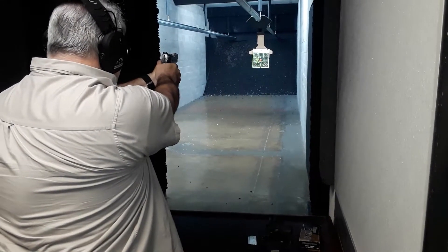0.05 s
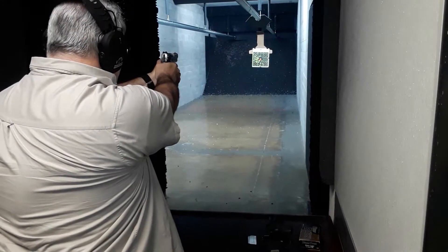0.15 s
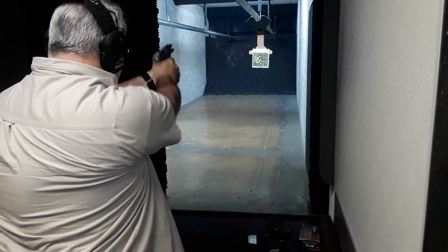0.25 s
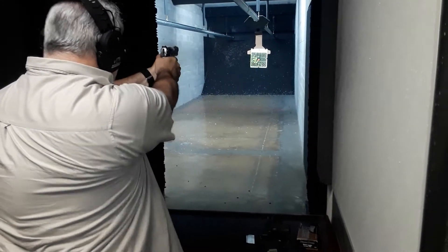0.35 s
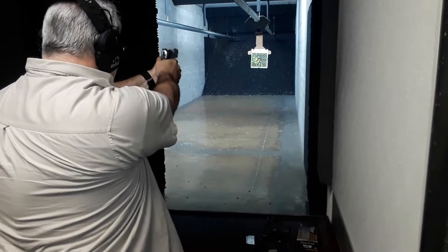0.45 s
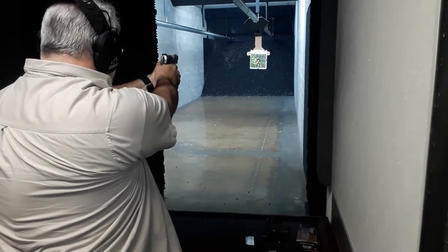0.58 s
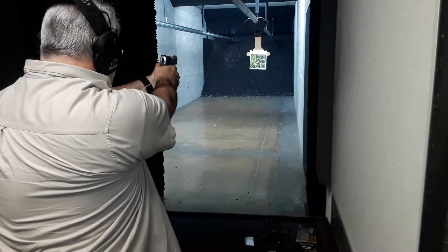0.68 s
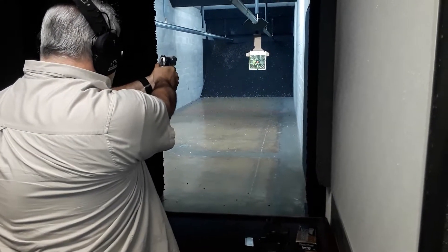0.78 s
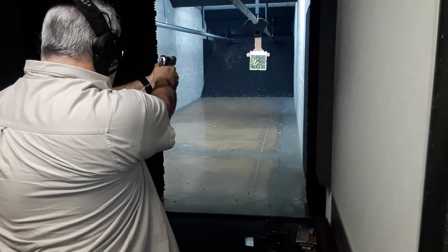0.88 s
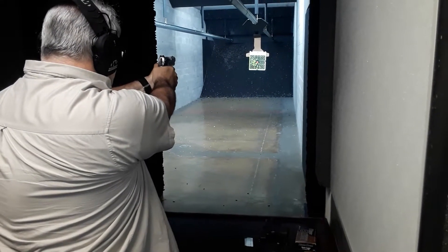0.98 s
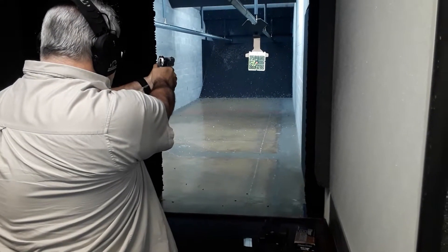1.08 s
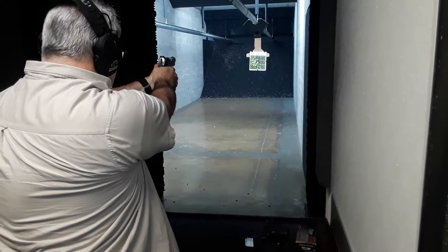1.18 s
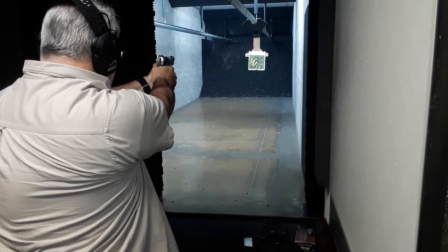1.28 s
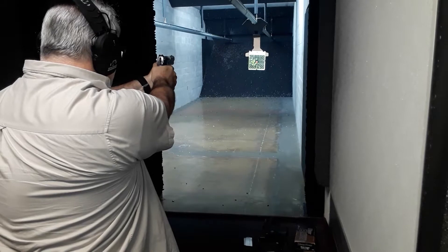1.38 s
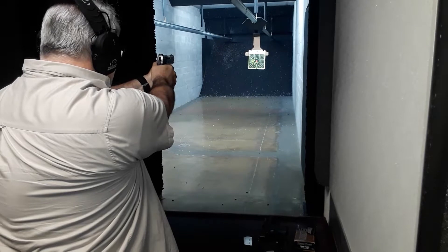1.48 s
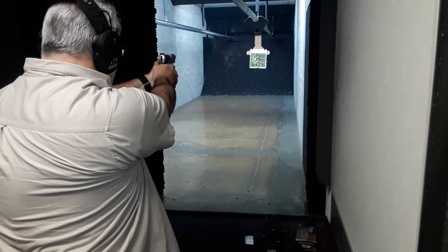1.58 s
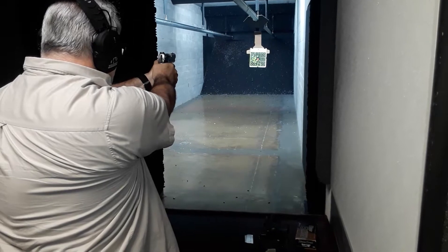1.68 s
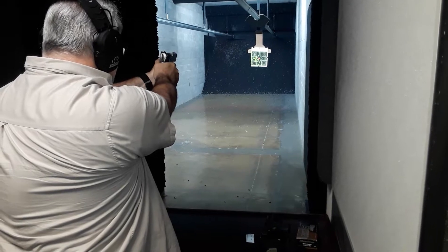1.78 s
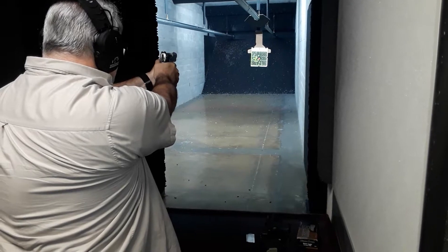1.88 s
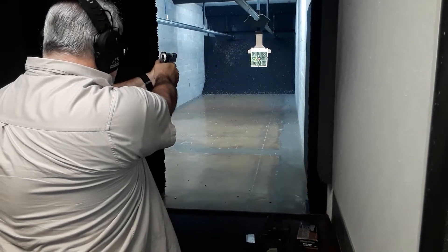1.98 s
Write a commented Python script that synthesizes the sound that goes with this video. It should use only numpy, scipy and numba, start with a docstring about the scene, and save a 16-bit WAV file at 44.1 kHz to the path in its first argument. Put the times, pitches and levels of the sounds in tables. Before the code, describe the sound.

One loud pistol shot goes off close by at about 0.25 seconds, over the steady rush and hum of ventilation in an indoor range. The sharp crack swells into a booming echo that fades by about 1 second. Near 0.7 seconds a spent brass case ticks faintly on the floor with a thin ring. The ventilation drops in level after the shot and comes back around 1.5 seconds.

```python
"""One pistol shot in a lane of an indoor range, heard from just behind the shooter over the ventilation.
The muzzle blast rattles round the booth, the concrete hall swells into a roar, standing waves ring on
and echoes slap back down the lane. The spent brass case ticks on the floor and rings.
The shot overloads the microphone's gain control, which ducks everything
and lets the ventilation back up more than a second later."""
import sys
import numpy as np
from scipy import signal
from scipy.fft import rfft, irfft
from scipy.io import wavfile
from numba import njit

SR = 44100
rng = np.random.default_rng(int(sys.argv[2]) if len(sys.argv) > 2 else 0)


def dump_mix(stems):
    """Bounce the given channels to the path in sys.argv[1] as a 16-bit WAV at rate SR."""
    frames = np.atleast_2d(stems).T  # one column per channel
    limited = np.clip(frames, -1, 1)  # hard clip at full scale
    pcm = np.round(limited * 32767).astype(np.int16)
    wavfile.write(sys.argv[1], SR, pcm)


N = 88200
SHOT_S = .2477


def undb(db):
    """Decibels to gain."""
    return 10 ** (np.asarray(db) / 20)


def lookup(table, hz):
    """The columns of a table at a frequency, on a log axis."""
    columns = np.array(table, float).T
    return [np.interp(np.log(hz + 1e-3), np.log(columns[0]), column) for column in columns[1:]]


def fade(age, t60):
    """Full level until age 0, then an exponential decay."""
    return undb(-60 * np.maximum(age, 0) / t60)


def rise(age, attack_s):
    """A smooth attack from silence."""
    return 1 - np.exp(-(np.maximum(age, 0) / attack_s) ** 2)


# How alike left and right are: frequency_hz, correlation
STEREO_LIKENESS = [(30, 0.62), (70, .98), (160, 1), (300, 0.87), (700, 0.73), (1300, 0.28), (2500, 0.084),
                   (5000, -0.044), (15000, .05)]

def diffuse():
    """Spectrum of a diffuse stereo noise: centred in the bass, wide in the treble."""
    hz = np.arange(N // 2 + 1) * SR / N
    alike = np.clip(lookup(STEREO_LIKENESS, hz)[0], -.999, .999)
    mid, side = rfft(rng.standard_normal((2, N)))
    return mid * np.sqrt((1 + alike) / 2) + np.array([[1], [-1]]) * side * np.sqrt((1 - alike) / 2)


def noise_band(hz, octaves):
    """Diffuse noise at rms 1, tapering to nothing `octaves` either side of hz."""
    offset = np.log2((np.arange(N // 2 + 1) + 1) * SR / N / hz) / octaves
    noise = irfft(diffuse() * np.cos(np.clip(offset, -1, 1) * np.pi / 2), N)
    return noise / np.std(noise)


def noise_bank():
    """Unrelated half-octave noises that sum to rms 1 per octave."""
    centres = 31.25 * 2 ** np.arange(0, 9.1, .5)
    return [(hz, noise_band(hz, .51) / np.sqrt(2)) for hz in centres]


# Drone of the ducts, before the trim: pitch_hz, half_width_octaves, level_db
DUCT_DRONES = [(136.7, 0.052, -42.5), (184, 0.075, -41), (205.3, 0.055, -37), (242.6, 0.045, -34.5),
               (302, 0.09, -48.5), (334.4, 0.035, -38), (362.3, 0.043, -43.5), (1004, .05, -51),
               (1447, .05, -52), (1790, .05, -46)]
# Rush of the grilles, before the trim: frequency_hz, octave_level_db
GRILLE_RUSH = [(30, -48), (55, -56), (85, -40.5), (130, -37), (200, -31.5), (310, -37), (480, -41.5),
               (900, -39.5), (1700, -33), (2500, -44.5), (3300, -47), (5500, -60), (8000, -64.5),
               (10500, -73.5), (15000, -73.5)]

def ventilation(t, flutter_db=.4, trim_db=.5):
    """The bed: air drones in the ducts and rushes from the grilles, the rush fluttering a little."""
    air = sum(undb(db) * noise_band(hz, width) for hz, width, db in DUCT_DRONES)
    for hz, noise in noise_bank():
        flutter = np.interp(t, np.linspace(0, t[-1], 20), rng.standard_normal(20))
        air += noise * undb(lookup(GRILLE_RUSH, hz)[0] + flutter_db * flutter)
    return air * undb(trim_db)


def muzzle_blast(age, gain_db=13.5, push_s=.0017, attack_s=.0002):
    """The punch: a sudden push and a longer suction, in inverted polarity."""
    progress = np.maximum(age, 0) / push_s
    return -undb(gain_db) * rise(age, attack_s) * (1 - progress) * np.exp(-progress)


# Tone of the booth's reflections: frequency_hz, octave_level_db
BOOTH_TONE = [(30, -32), (70, -20.5), (150, -18), (300, -14.5), (600, -6), (1200, 2.5), (2400, 2),
              (4800, -3.5), (9000, -12), (14000, -11)]

def booth_crack(age, attack_s=.0012, hold_s=.041, t60_s=.12):
    """The crack: bright, dense reflections off the partitions and ceiling."""
    crack = sum(undb(lookup(BOOTH_TONE, hz)[0]) * noise for hz, noise in noise_bank())
    return crack * rise(age, attack_s) * fade(age - hold_s, t60_s)


# Roar of the hall: frequency_hz, octave_level_db, crest_after_shot_s, t60_s
HALL_ROAR = [(30, -26, .18, 0.88), (65, -20.5, 0.17, 0.35), (123, -3.5, 0.12, 0.89),
             (200.4, -2, 0.13, 0.79), (410, -5, 0.14, 0.73), (818, 3.5, 0.12, .53), (1530, 0.5, 0.13, 0.5),
             (2950, -4, 0.073, 0.6), (6000, -18, 0.091, .52), (9880, -15, 0.047, 0.5),
             (15000, -28, 0.086, .37)]

def hall_roar(age, swell_share=.42, steepening=1.264, tail_db=-18, tail_t60_s=1.77):
    """The body: the hall fills, bass last, then dies away ever faster, leaving a slow, dark tail."""
    out = 0
    for hz, noise in noise_bank():
        db, crest_s, t60_s = lookup(HALL_ROAR, hz)
        swell = rise(age, swell_share * crest_s)
        roar = undb(-60 * (np.maximum(age - crest_s, 0) / t60_s) ** steepening)
        tail = undb(tail_db) * fade(age - crest_s, tail_t60_s) / (1 + (hz / 2300) ** 2)
        out += noise * undb(db) * np.hypot(roar, tail) * swell
    return out


# Resonances of the lane: pitch_hz, level_db
LANE_RESONANCES = [(140, -6), (170, -7), (194, -2), (227, -5.5), (324, -10), (364, -8.5), (466, -5.5),
                   (534, -15), (583, -3.5), (623, -21), (728, -4), (823, -11.5), (951, -8), (1135, -11.5),
                   (1232, -6.5), (1383, -10.5), (1997, -10.5)]

def standing_waves(age, detune_hz=7, swell_s=.052, hold_s=.08, t60_s=.85):
    """Clusters of three close modes between the concrete walls build with the roar, beat and ring on."""
    out = 0
    for hz, db in LANE_RESONANCES:
        for _ in range(3):
            pitch_hz = hz + detune_hz * rng.uniform(-1, 1)
            phase = rng.uniform(0, 2 * np.pi)
            stereo_phase = rng.standard_normal((2, 1)) * hz / 1500  # higher modes sound wider
            out += undb(db) * np.sin(2 * np.pi * pitch_hz * age + phase + stereo_phase) / np.sqrt(3)
    return out * rise(age, swell_s) * fade(age - hold_s, t60_s)


# Strong echoes: peak_time_s, level_db, centre_hz, half_width_octaves (at half power), half_length_s
LANE_ECHOES = [(0.298, 6.5, 250, 0.99, 0.016), (.347, -13.5, 7740, 0.48, 0.013),
               (0.36, 6, 806, 0.43, 0.016), (0.426, 1.5, 195, 0.25, .01), (0.571, -14.5, 1020, 0.19, 0.013),
               (.62, -9, 187, 0.28, 0.0086)]

def lane_echoes(t):
    """The blast slaps back from down the lane, smeared into soft-edged bursts of noise."""
    return sum(undb(db) * noise_band(hz, 2 * width) * np.exp(-((t - peak_s) / half_length_s) ** 2)
               for peak_s, db, hz, width, half_length_s in LANE_ECHOES)


# Landings of the case: start_s, tick_db, ring_db, ring_attack_s
CASE_LANDINGS = [(.683, -25, -64, 0.011), (.886, -85, -56, .045)]
# Partials of the brass: pitch_hz, level_db (relative to ring_db), t60_s
BRASS_PARTIALS = [(7350, 17.5, 0.21), (7310, -8, .22), (11690, -16, .35)]

def spent_case(t, tick_hz=4290, tick_t60_s=.029, splash_db=-18):
    """The brass case ticks on the floor and rings thinly as it tumbles."""
    out = 0
    for start_s, tick_db, ring_db, ring_attack_s in CASE_LANDINGS:
        age = t - start_s
        tick = noise_band(tick_hz, octaves=.13) + undb(splash_db) * noise_band(7500, octaves=1.3)
        out += undb(tick_db) * tick * rise(age, attack_s=.0005) * fade(age, tick_t60_s)
        for hz, db, t60_s in BRASS_PARTIALS:
            partial = np.sin(2 * np.pi * hz * age + rng.uniform(0, 2 * np.pi, (2, 1)))
            out += undb(ring_db + db) * partial * rise(age, ring_attack_s) * fade(age, t60_s)
    return out


def scene():
    """The dry mix: the shot, its room and the case over the ventilation bed."""
    t = np.arange(N) / SR
    age = t - SHOT_S
    shot = muzzle_blast(age) + booth_crack(age) + hall_roar(age) + standing_waves(age) + lane_echoes(t)
    return shot + spent_case(t) + ventilation(t)


# Peaks and dips of the microphone: centre_hz, half_width_octaves, gain_db
MIC_COLOUR = [(2430, 0.069, -0.5), (4470, 0.067, -2.5), (5560, .15, 3.5), (6910, .1, -1.5), (7870, 0.19, 3),
              (9600, 0.11, -2.5), (13500, 0.24, 4.5)]
# Stereo balance: frequency_hz, right_over_left_db
MIC_BALANCE = [(60, -1), (200, 1.5), (600, 0), (1100, 2.5), (2200, 1), (8000, 1), (13000, 1.8)]

def microphone(sound, low_cut_hz=65.4):
    """The ports add peaks and dips to the treble, lean to the right and shed the deep bass."""
    hz = (np.arange(N + 1) + 1) * SR / (2 * N)
    colour_db = sum(db * np.exp(-(np.log2(hz / centre) / width) ** 2) for centre, width, db in MIC_COLOUR)
    balance_db = np.array([[-1], [1]]) * lookup(MIC_BALANCE, hz)[0] / 2
    coloured = irfft(rfft(sound, 2 * N) * undb(colour_db + balance_db))[:, :N]
    low_cut = signal.butter(3, low_cut_hz, btype="high", fs=SR, output="sos")
    return signal.sosfilt(low_cut, coloured)


@njit
def hold_and_release(wanted_db, hold_s, release_db_per_s, settle_s):
    """Gain reduction in dB: grabs at once, holds, then lets go steadily and eases out."""
    reduction_db = np.zeros(len(wanted_db))
    now_db, waited = 0., 0
    for i in range(len(wanted_db)):
        waited += 1
        if wanted_db[i] >= now_db:
            now_db, waited = wanted_db[i], 0
        elif waited > hold_s * SR:
            now_db -= min(release_db_per_s, now_db / settle_s) / SR
        reduction_db[i] = now_db
    return reduction_db


def gain_control(sound, threshold_db=-13.5, max_duck_db=14.5, average_s=.02, lookahead_s=.002):
    """Ducks both channels when their smoothed power passes the threshold."""
    pole = np.exp(-1 / (average_s * SR))
    power = signal.lfilter([1 - pole], [1, -pole], np.mean(sound ** 2, axis=0))
    wanted_db = np.clip(10 * np.log10(power + 1e-12) - threshold_db, 0, max_duck_db)
    early_db = np.pad(wanted_db, (0, int(lookahead_s * SR)))[-N:]
    return sound * undb(-hold_and_release(early_db, hold_s=1.029, release_db_per_s=69.5, settle_s=.054))


def record(dry):
    """The chain: microphone colour, ducking, soft clipping and a steep high cut."""
    ducked = gain_control(microphone(dry))
    clipped = ducked / (1 + ducked ** 6) ** (1 / 6)
    high_cut = signal.ellip(10, .2, 80, 15900, fs=SR, output="sos")
    return signal.sosfilt(high_cut, clipped)


dry = scene()
out = record(dry)
dump_mix(out)
```